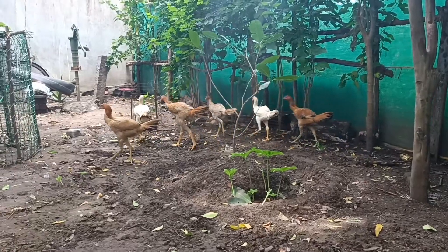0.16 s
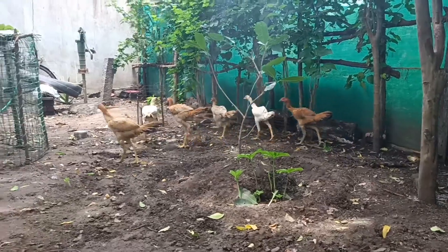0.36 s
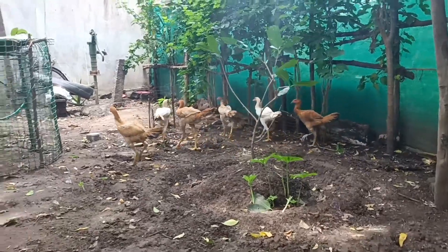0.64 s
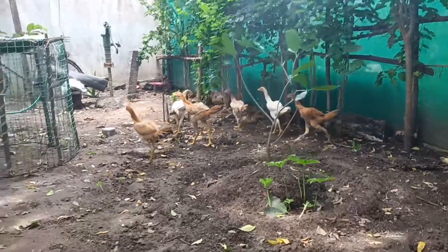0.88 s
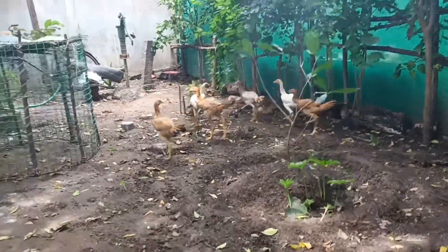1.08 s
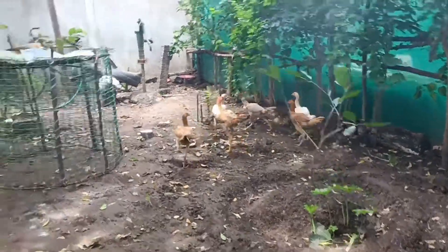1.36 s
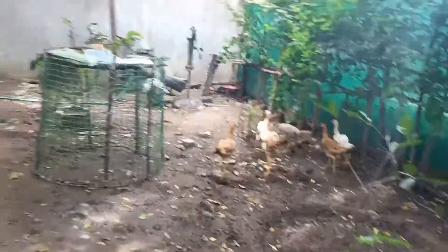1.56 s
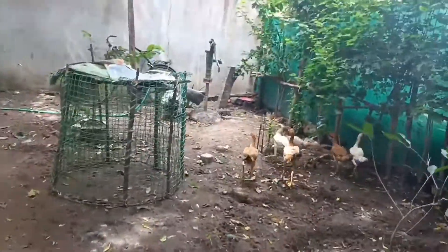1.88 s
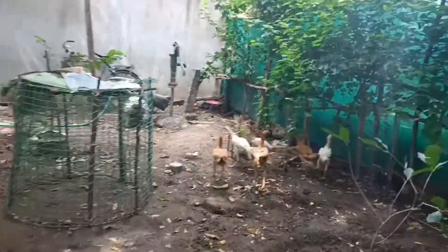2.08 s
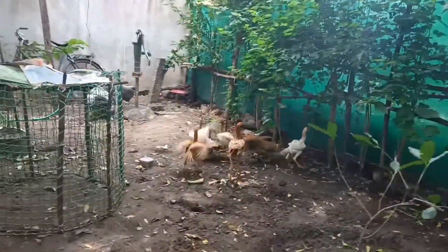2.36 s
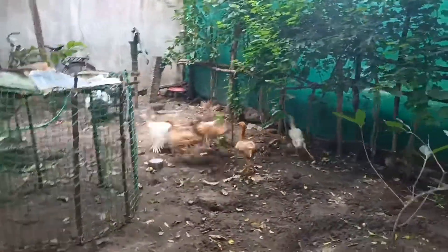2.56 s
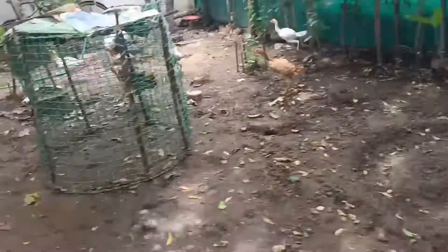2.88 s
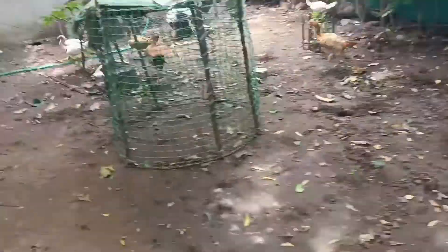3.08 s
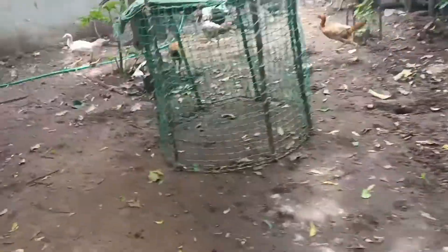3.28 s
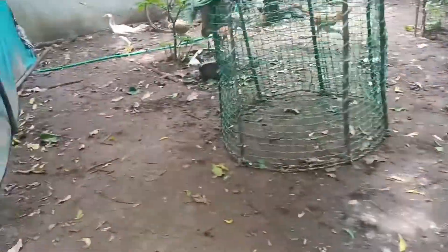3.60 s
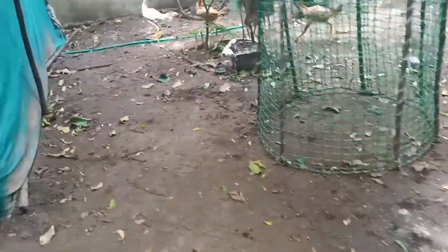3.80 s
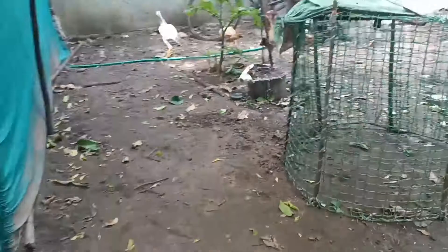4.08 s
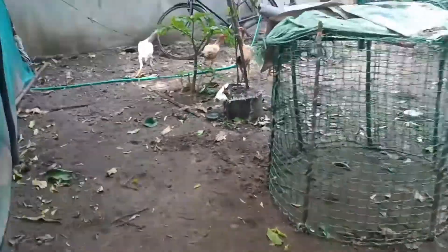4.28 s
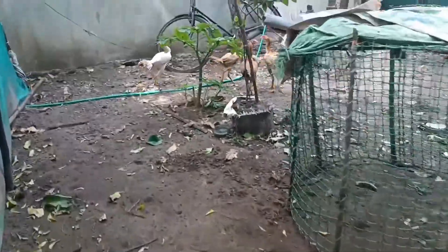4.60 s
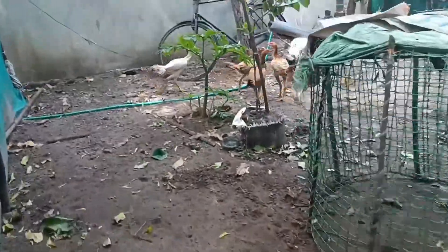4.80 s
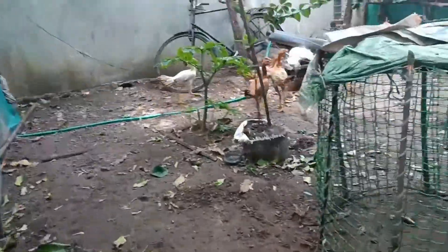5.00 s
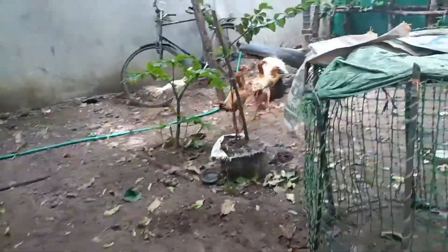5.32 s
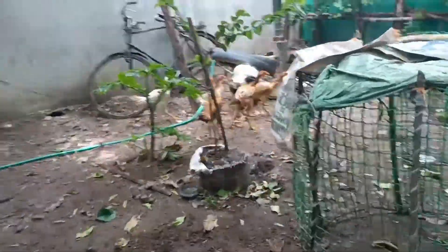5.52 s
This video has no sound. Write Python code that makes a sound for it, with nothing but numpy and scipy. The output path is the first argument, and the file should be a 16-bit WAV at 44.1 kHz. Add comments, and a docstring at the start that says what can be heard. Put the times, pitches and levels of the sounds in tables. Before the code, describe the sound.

A quiet walled yard, with a faint distant murmur, leaf hiss and low lumpy wind rumble on a small handheld microphone whose treble rings slightly. For the first two seconds, young chickens give sparse, short, gliding clucks, with soft wing swishes, light steps and a faint rasp from another bird around 1.1. At about 2.3 the flock startles: tight, sharp clucks and accelerating wing flaps, then the loudest blows, crackling thumps with twig snaps, between 2.55 and 2.8. The flurry falls away into rustling leaves by 3.1, as a hoarse bird caws further off, again near 3.85 and 4.35, throaty and rasping. Small clucks and high peeps come around 3.5, 3.7 and 4.3. From 4.6 claws scratch dry ground, with tiny clicks; a cluster of peeps and clucks near 5.0 to 5.2 meets a stronger scrape, which fades under murmur. Short wall echoes surround the calls.

```python
"""Chickens scatter in a walled yard

Young chickens cluck close by in a walled dirt yard, then scatter with wings and feet over dry leaves.
Clucks are gliding partials; wings, feet and leaves are bursts of coloured noise; snaps are brief rings.
A hoarse bird caws further off, throat pulses and breath rasp ringing through a throat and a beak.
Light wind, low lumpy noise, rumbles on a small hand-held microphone that rings near 9 kHz."""
import sys
import numpy as np
from scipy import signal
from scipy.fft import rfft, irfft
from scipy.io import wavfile
from scipy.ndimage import uniform_filter1d

SR = 44100
rng = np.random.default_rng(int(sys.argv[2]) if len(sys.argv) > 2 else 0)


def convert_level_to_amplitude(level_db):
    """Map a level in decibels to its linear amplitude factor."""
    exponent = np.asarray(level_db, float) / 20
    return 10 ** exponent


def inscribe(sig):
    """Save sig as 16-bit PCM at rate SR to the path in sys.argv[1].

    A 1-D sig is mono; a 2-D sig holds one channel per row.
    Samples are clipped to [-1, 1] before scaling.
    """
    pcm = np.round(np.clip(np.atleast_2d(sig).T, -1, 1) * 32767)
    wavfile.write(sys.argv[1], SR, pcm.astype(np.int16))


N = 249165  # samples in the scene


def evened(x):
    """Scales to rms 1."""
    return x / np.sqrt(np.mean(x ** 2) + 1e-20)


def add(mix, s, sound):
    """Mixes a sound in at s seconds, cut off at the end of the mix."""
    part = mix[round(s * SR):][:len(sound)]
    part += sound[:len(part)]


def curve(s, db):
    """A level curve as a gain for every sample."""
    return convert_level_to_amplitude(np.interp(np.arange(N) / SR, s, db))


def colour(x, points):
    """Filters x by a spectrum drawn over log frequency, to rms 1."""
    point_hz, point_db = np.transpose(points)
    hz = np.fft.rfftfreq(len(x), 1 / SR)
    gain = convert_level_to_amplitude(np.interp(np.log(hz + 1), np.log(point_hz), point_db))
    return evened(irfft(rfft(x) * gain, len(x)))


def drift(size, hz):
    """Random wander up to about hz, rms 1."""
    b, a = signal.butter(2, hz, fs=SR)
    settle = 4000
    return evened(signal.lfilter(b, a, rng.standard_normal(size + settle))[settle:])


def resonate(x, hz, width_hz):
    """Shifts hz (fixed or a curve) down to zero, smooths, and shifts back: a resonance of gain 1."""
    turn = np.exp(2j * np.pi * np.cumsum(hz * np.ones(len(x))) / SR)
    r = np.exp(-np.pi * width_hz / SR)
    smoothed = signal.lfilter([1 - r], [1, -r], x / turn + 1e-18)
    return 2 * (turn * smoothed).real


def ragged(x, depth_db):
    """Uneven noise: random short patches of time and frequency swell and fade, to rms 1."""
    z = signal.stft(x, nperseg=256, noverlap=192)[2]
    patches = uniform_filter1d(rng.standard_normal(z.shape), 3, 0)  # over frequency
    patches = evened(uniform_filter1d(patches, 9, 1))  # over time
    return evened(signal.istft(z * convert_level_to_amplitude(depth_db * patches), nperseg=256, noverlap=192)[1][:N])


# Buffeting at the microphone port. Each row: frequency in Hz, relative level in dB per Hz.
WIND_COLOUR = [(25, -50), (45, -22.5), (85, 4.5), (130, -4.5), (220, -20.5), (400, -21.5), (800, -91)]
# Gusts over the port. Each row: start in seconds, level in dB before fading, fade in dB per second.
GUSTS = [(0, -57.5, 2), (.52, -37, 200), (.78, -51, 9), (1.09, -39.5, 41), (1.9, -59, 40),
         (2.27, -41, 13.5), (3.299, -30, 300), (3.5, -45, 58), (3.67, -43, 30), (4.28, -48.5, 10),
         (4.95, -53.5, 1)]
GUST_RISE_S, GUST_LONGEST_S, LULL_S = .03, 1., .1


def wind():
    """Lumpy low buffeting on the microphone port: gusts rise fast and fade; long ones drop to a lull."""
    power = np.zeros(N)
    next_gusts = GUSTS[1:] + [(N / SR + 1,)]
    for (s, db, fade_db), (next_s, *_) in zip(GUSTS, next_gusts):
        t = np.arange(0, next_s - s + GUST_RISE_S, 1 / SR)
        rise = np.minimum(t / GUST_RISE_S + (s == 0), 1)  # a gust at time 0 is already up
        drop = np.clip((GUST_LONGEST_S - t) / LULL_S, .05, 1)
        add(power, s, (rise * drop * convert_level_to_amplitude(db - fade_db * t)) ** 2)
    lumps = convert_level_to_amplitude(2.5 * drift(N, 18))
    return np.sqrt(power) * evened(colour(rng.standard_normal(N), WIND_COLOUR) * lumps)


# Murmur beyond the walls. Each row: frequency in Hz, relative level in dB per Hz.
MURMUR_COLOUR = [(100, 5), (300, -4), (700, -6.5), (1300, -6), (2100, -5), (2900, -9), (3500, -20),
                 (5500, -26), (9000, -32)]
# Hiss of dry leaves, also under wings and feet. Each row: frequency in Hz, relative level in dB per Hz.
LEAF_HISS = [(1500, -18.5), (3000, -1.5), (4500, -0.5), (6000, -2), (10000, -0.5), (15500, -10.5)]
# How much the yard stirs. Each row: time in seconds, murmur level in dB.
YARD_LEVEL = [(0, -56), (.3, -55), (.75, -56.5), (1, -54), (1.35, -57.5), (1.65, -64), (2.25, -52.5),
              (2.4, -42.5), (3.3, -48), (3.7, -50.5), (4.2, -50), (4.8, -50), (5.45, -48.5), (5.65, -52)]
LEAF_HISS_DB = -15.5  # leaves against the murmur


def yard():
    """Distant murmur of the street and hiss of leaves: coloured noises, gently flickering."""
    murmur = ragged(colour(rng.standard_normal(N), MURMUR_COLOUR), 1.94)
    murmur *= convert_level_to_amplitude(1.8 * drift(N, 7.1))
    leaves = colour(rng.standard_normal(N), LEAF_HISS) * convert_level_to_amplitude(LEAF_HISS_DB + 2.2 * drift(N, 8.8))
    return curve(*np.transpose(YARD_LEVEL)) * (murmur + leaves)


# Feet and wings dragging on the ground. Each row: frequency in Hz, relative level in dB per Hz.
SCRAPE = [(500, -11.5), (1300, 7), (2100, 9), (2900, 7.5), (3600, -0.5), (5500, -18.5), (9000, -24.5)]
# Weight of a beat or step. Each row: frequency in Hz, relative level in dB per Hz.
THUD = [(60, -43), (140, -3.5), (320, -1.5), (500, -12.5), (1100, -9), (1800, -11.5), (3500, -36)]
# Kinds of contact, by name. Each row: hiss in dB, scrape in dB, thud in dB.
CONTACTS = {"flap": (0, 2.2, 12.1), "thump": (-17.5, -14.5, 0), "step": (0, 5.6, 4), "rustle": (0, 2, -28),
            "scuff": (-11, 0, -25), "scratch": (-30, 0, -40), "swish": (0, -35, -24)}
# Wing beats and feet among leaves. Each row: start in seconds, level in dB before the contact's own,
# length scale in seconds, kind of contact.
SCUFFS = [(0.18, -43, 0.055, "swish"), (0.528, -36.5, 0.073, "flap"), (0.687, -38, 0.12, "scuff"),
          (0.814, -30.5, 0.11, "thump"), (1.24, -46, .04, "step"), (1.528, -48.5, 0.059, "swish"),
          (1.796, -41.5, .023, "swish"), (1.905, -34.5, 0.16, "step"), (2.037, -42, 0.21, "step"),
          (2.285, -22.5, 0.11, "flap"), (2.381, -16.5, 0.13, "flap"), (2.496, -16, 0.11, "flap"),
          (2.577, -5, 0.03, "thump"), (2.6, -21, 0.086, "flap"), (2.68, -9, 0.084, "thump"),
          (2.713, -14.5, 0.083, "flap"), (2.792, -5.5, 0.028, "thump"), (2.869, -23.5, 0.093, "step"),
          (2.985, -26.5, 0.063, "rustle"), (3.041, -25.5, 0.25, "swish"), (3.106, -21, 0.14, "rustle"),
          (3.237, -25.5, 0.22, "rustle"), (3.309, -30, 0.04, "step"), (3.394, -32, 0.2, "rustle"),
          (3.514, -36.5, .1, "rustle"), (3.839, -30, 0.32, "scuff"), (4.081, -29, 0.094, "thump"),
          (4.338, -24, .04, "scuff"), (4.385, -34, 0.037, "rustle"), (4.622, -21.5, 0.25, "scratch"),
          (4.638, -36, .04, "rustle"), (4.707, -21, 0.0075, "rustle"), (4.792, -25.5, 0.12, "scratch"),
          (5.15, -37, 0.059, "rustle"), (5.157, -17.5, 0.2, "scratch"), (5.245, -18.5, 0.048, "scuff"),
          (5.34, -38, .01, "swish"), (5.363, -30, 0.37, "scuff")]
GRAINS_PER_S = 2500


def scuffs():
    """Crackling leaf grit as hiss and scrape, and smooth noise as thud, burst out at each beat or step."""
    grain_level = convert_level_to_amplitude(1.42 * np.minimum(rng.exponential(1, N), 4))
    grit = grain_level * (rng.random(N) < GRAINS_PER_S / SR) * rng.standard_normal(N)
    grit = evened(grit) + 1.08 * rng.standard_normal(N)
    hiss = ragged(colour(grit, LEAF_HISS), 2.2)
    scrape = ragged(colour(grit, SCRAPE), 3.3)
    thud = ragged(colour(rng.standard_normal(N), THUD), 3)
    parts = np.array([hiss, scrape, thud])
    parts *= convert_level_to_amplitude([2.5 * drift(N, 60) for _ in parts])
    power = np.zeros((N, 3))
    t = np.arange(SR // 2) / SR
    onset, settling = 1 - np.exp(-t / .002), .2 * np.exp(-t / .09)
    for s, db, length, contact in SCUFFS:
        shape = onset * (np.exp(-.8 * t / length - (t / length) ** 3) + settling)
        part_gains = convert_level_to_amplitude(db + np.array(CONTACTS[contact]))
        add(power, s, (shape[:, None] * part_gains) ** 2)
    hiss_peak = np.quantile(abs(parts[0]), .99998)
    return (np.sqrt(power.T) * parts).sum(0) / hiss_peak


def cluck(length, start_hz, end_hz, db, half_db, octave_db, rough):
    """A short gliding tone, richer when loud; strong-weak cycles add half-pitch lines, roughness shakes it."""
    n = round(length * SR)
    u = np.arange(n) / n
    wobble, shake = drift(8000, 150)[:n], drift(8000, 170)[:n]
    pitch_hz = (start_hz + (end_hz - start_hz) * u) * (1 + .04 * rough * wobble)
    angle = np.pi * np.cumsum(pitch_hz) / SR  # phase of the half pitch
    tone = np.sin(2 * angle) + convert_level_to_amplitude(octave_db) * np.sin(4 * angle)
    tone += convert_level_to_amplitude(octave_db + db + 10.0) * (np.sin(6 * angle) + 0.35 * np.sin(8 * angle))
    lowest = np.sin(angle) * np.clip(4 - start_hz / 330, .1, 1)  # weaker in high calls
    tone += convert_level_to_amplitude(half_db) * (lowest + 0.58 * np.sin(3 * angle))
    swell = np.sin(np.pi * u ** 1.1) ** .8
    return convert_level_to_amplitude(db) * tone * (1 - rough + rough * shake) * swell


# Kinds of voice, by name. Each row: half-pitch partials in dB, octave in dB, roughness from 0 to 1.
VOICES = {"clear": (-21, -41, 0.25), "bright": (-26, -5.5, 0.24), "split": (-8.5, -20, 0.36),
          "hoarse": (-16, -17, 0.58), "deep": (0, -28, 0.41)}
# Clucks of the young chickens. Each row: start in seconds, length in seconds, start pitch in Hz,
# end pitch in Hz, level in dB, kind of voice.
CLUCKS = [(0.252, 0.042, 837, 905, -55, "clear"), (0.893, 0.071, 1100, 876, -41, "deep"),
          (0.947, 0.073, 932, 916, -44.5, "bright"), (1.104, 0.076, 834, 784, -47.5, "clear"),
          (1.035, 0.033, 1670, 1800, -51.5, "clear"), (1.25, 0.037, 1107, 1024, -33, "clear"),
          (1.276, 0.09, 928, 858, -50, "hoarse"), (1.541, 0.071, 900, 840, -49.5, "clear"),
          (1.773, 0.038, 930, 930, -53.5, "clear"), (2.0, 0.084, 891, 973, -42.5, "hoarse"),
          (2.211, .063, 839, 735, -43.5, "clear"), (2.338, 0.032, 1560, 1215, -17.5, "split"),
          (2.365, 0.013, 1067, 998, -17, "bright"), (2.385, .033, 850, 1214, -27, "hoarse"),
          (2.483, 0.0515, 1262, 1354, -19, "split"), (2.567, 0.012, 1320, 1340, -22.5, "clear"),
          (2.6, .039, 892, 903, -25.5, "split"), (3.437, .021, 2060, 2070, -42.5, "clear"),
          (3.487, 0.035, 2080, 2050, -39, "clear"), (3.528, 0.071, 876, 847, -34, "bright"),
          (3.577, 0.064, 955, 942, -39, "split"), (3.72, 0.0354, 1223, 930, -32.5, "bright"),
          (4.287, 0.05, 1220, 995, -31.5, "bright"), (4.65, 0.045, 884, 816, -41, "clear"),
          (4.971, 0.049, 2150, 1996, -30.5, "clear"), (4.975, .06, 1250, 1094, -34, "clear"),
          (5.009, 0.079, 1046, 895, -43.5, "bright"), (5.106, 0.031, 834, 824, -40.5, "clear"),
          (5.139, 0.04, 974, 796, -36, "clear"), (5.174, 0.039, 1019, 837, -33.5, "deep"),
          (5.544, .048, 3730, 3710, -53.5, "clear")]


def clucks():
    """Every cluck at its time, each a gliding tone in its kind of voice."""
    calls = np.zeros(N)
    for s, *row, voice in CLUCKS:
        add(calls, s, cluck(*row, *VOICES[voice]))
    return calls


THROB_HZ, THROB_WAVER = 87.3, .35  # throat pulse rate, and its rms waver as a share of it
THROAT_WIDTH_HZ, HALF_THROAT_DB = 165, -21  # width of each pass; band at half the throat pitch
BEAK_HZ, BEAK_WIDTH_HZ, BEAK_FOLLOW = 1293, 275, 0.26  # open-beak band, plus a share of throat pitch
RASP = .6  # breath noise against the pulses


def caw(rows):
    """Uneven slow pulses and breath rasp ring the throat; the opening beak moves them to a higher band."""
    s, *columns = np.transpose(rows)
    t = np.arange(s[0], s[-1], 1 / SR)
    effort_db, throat_hz, beak = (np.interp(t, s, column) for column in columns)
    rate_hz = THROB_HZ * np.clip(1 + THROB_WAVER * drift(len(t), 39.73), .2, 3)
    turns = np.cumsum(rate_hz) / SR
    pulses = np.diff(np.floor(turns), prepend=0) * convert_level_to_amplitude(0.91 * drift(len(t), 27))
    drive = evened(pulses) + RASP * rng.standard_normal(len(t))
    bands = [(throat_hz, 1 - beak, THROAT_WIDTH_HZ),
             (BEAK_HZ + BEAK_FOLLOW * throat_hz, beak, BEAK_WIDTH_HZ),
             (throat_hz / 2, (1 - beak) * convert_level_to_amplitude(HALF_THROAT_DB), THROAT_WIDTH_HZ)]
    voice = np.zeros(len(t))
    for hz, share, width_hz in bands:
        voice += share * evened(resonate(resonate(drive, hz, width_hz), hz, width_hz))
    voice /= np.hypot(beak, 1 - beak)  # steadies the power as the beak moves
    return s[0], convert_level_to_amplitude(effort_db) * voice * signal.windows.tukey(len(t), .1)


# Caws of the hoarse bird further off, one list a caw. Each row: time in seconds, effort in dB,
# throat pitch in Hz, beak opening from 0 to 1.
CAWS = [
    [(1.09, -55, 1290, 0.7), (1.29, -58, 1340, 0.73)],
    [(3.045, -50, 1190, .02), (3.1, -34.5, 1303, 0.37), (3.22, -37, 1280, 0.3), (3.32, -37.5, 1250, 0.67),
     (3.39, -53, 1340, 0)],
    [(3.815, -56, 1450, 0.3), (3.845, -35, 1523, 0.2), (3.94, -40, 1480, 0), (3.99, -41.5, 1470, 0.66),
     (4.08, -40.5, 1300, 0.73), (4.14, -53, 1200, 0.86)],
    [(4.33, -38.5, 1240, 0.4), (4.4, -33.5, 1268, 0.36), (4.5, -39, 1303, 0.29), (4.65, -43.5, 1214, 0.67),
     (4.76, -58, 1180, 0.2)],
]


def caws():
    """Every caw at its time, each a pulsed throat heard through a moving beak."""
    calls = np.zeros(N)
    for rows in CAWS:
        add(calls, *caw(rows))
    return calls


def snap(db, hz, t60):
    """A sharp crack around the pitch of a ring of two partials that dies almost at once."""
    t = np.arange(4000) / SR
    crack = resonate(rng.standard_normal(len(t)) * convert_level_to_amplitude(-60 * t / 0.0021), hz, hz)
    ring = np.sin(2 * np.pi * hz * t) + 0.72 * np.sin(2 * np.pi * 0.576 * hz * t)
    ring *= (1 - np.exp(-t * hz / 2)) * convert_level_to_amplitude(-60 * t / t60)
    return convert_level_to_amplitude(db) * (0.048 * crack / abs(crack).max() + ring / abs(ring).max())


# Twigs, pebbles and knocks. Each row: start in seconds, level of the ring's peak in dB, pitch in Hz,
# time to fall 60 dB in seconds.
SNAPS = [(1.091, -37, 3260, 0.0018), (1.113, -27, 113, 0.033), (1.846, -41.5, 2580, 0.0062),
         (1.909, -36, 2000, 0.0024), (2.293, -25, 2560, .008), (2.607, -10, 2120, 0.0064),
         (2.718, -9.5, 1090, 0.032), (3.116, -30, 2140, 0.014), (3.398, -35.5, 330, 0.034),
         (3.68, -34, 8800, 0.0011), (3.91, -44, 7100, .0012), (4.126, -25, 1580, 0.0019),
         (4.202, -40, 930, 0.01), (4.294, -25, 1620, 0.0026), (4.734, -30, 6130, 0.00064),
         (4.815, -39.5, 4540, .015), (4.915, -39.5, 4300, 0.013)]


def snaps():
    """Every twig, pebble and knock at its time, each a crack and a short ring."""
    knocks = np.zeros(N)
    for s, *row in SNAPS:
        add(knocks, s, snap(*row))
    return knocks


# Echoes off the yard walls. Each row: delay in seconds, level in dB against the direct sound.
WALLS = [(.004, -21), (.009, -8.5), (.017, -21)]
TAIL_DB, TAIL_T60_S = -16, .25


def walls(x):
    """A few hard echoes and a short diffuse tail of decaying noise, added to the direct sound."""
    t = np.arange(SR // 2) / SR
    taps = rng.standard_normal(len(t)) * convert_level_to_amplitude(-60 * t / TAIL_T60_S) * (t > .012)
    taps *= convert_level_to_amplitude(TAIL_DB) / np.linalg.norm(taps)
    taps[0] = 1  # direct sound
    for s, db in WALLS:
        taps[round(s * SR)] += convert_level_to_amplitude(db)
    return signal.oaconvolve(x, taps)[:N]


def scene():
    """Birds and snaps echo in the walled yard, over scuffs, the yard's murmur and wind."""
    echoing = walls(clucks() + caws() + snaps())
    return (wind() + yard() + scuffs() + echoing)[None]


def low_pass(x):
    """Removes everything above the highest recorded frequency."""
    return signal.sosfilt(signal.butter(12, 16630, fs=SR, output="sos"), x)


MIC_HZ, MIC_WIDTH_HZ, MIC_DB = 9250, 650, 12  # port resonance, level of the ringing added
MIC_LOW_HZ, MIC_TOP_HZ = 45, 15750


def record(dry):
    """The microphone port rings in the treble; the bass and the top are cut."""
    ringing = dry + convert_level_to_amplitude(MIC_DB) * resonate(dry[0], MIC_HZ, MIC_WIDTH_HZ)
    bass_cut = signal.butter(4, MIC_LOW_HZ, "high", fs=SR, output="sos")
    ringing = signal.sosfilt(bass_cut, ringing)
    top_cut = signal.firwin(511, MIC_TOP_HZ, window=("kaiser", 7), fs=SR)
    mix = signal.oaconvolve(ringing, top_cut[None], "same")
    return low_pass(mix)


dry = scene()
out = record(dry)
inscribe(out)
```